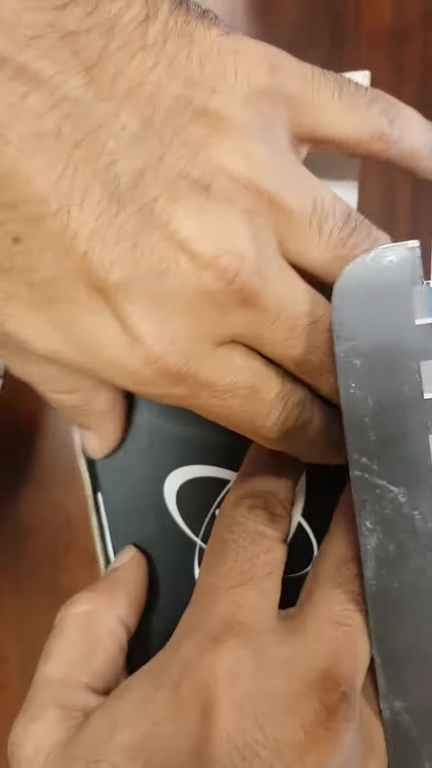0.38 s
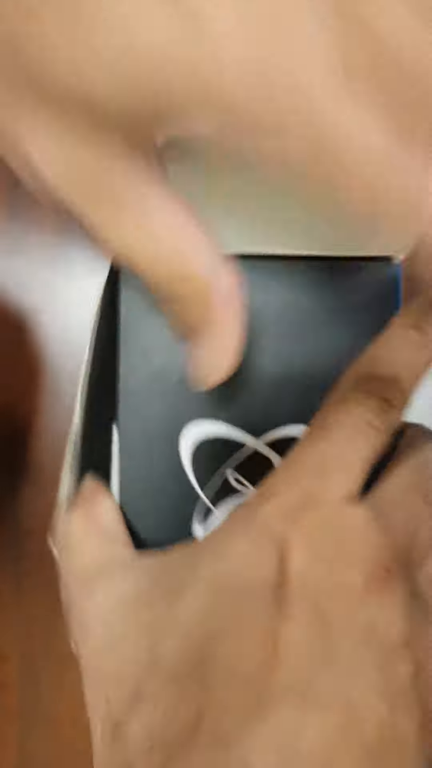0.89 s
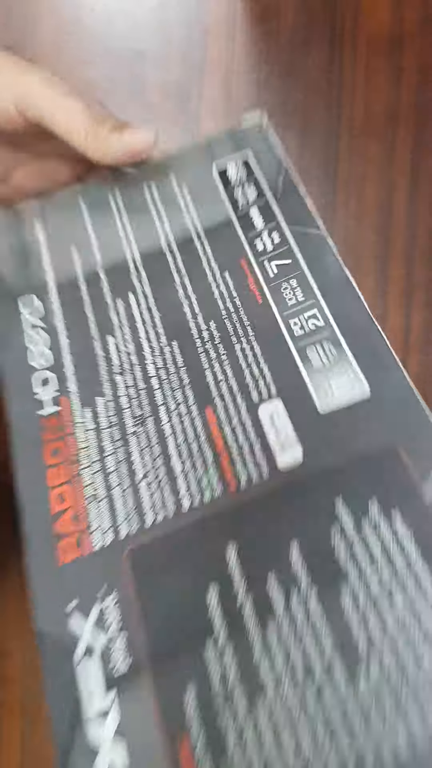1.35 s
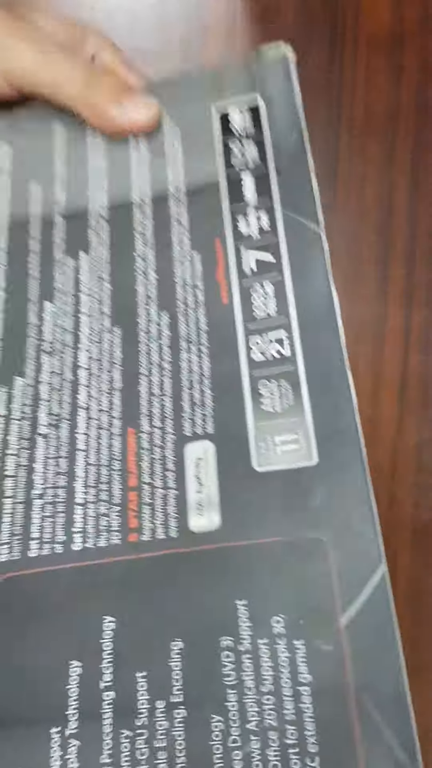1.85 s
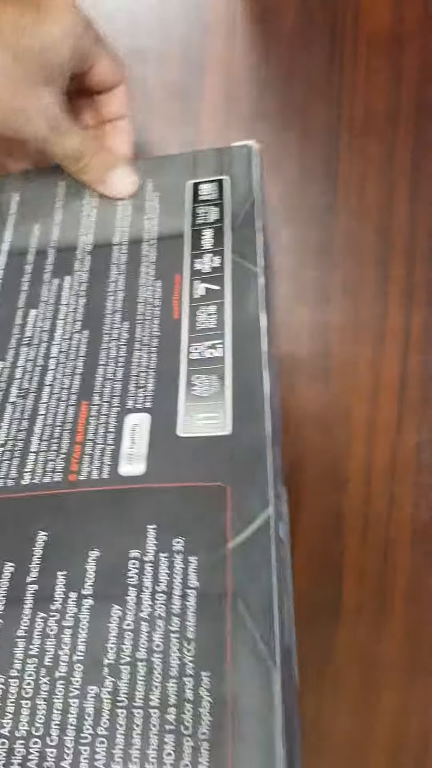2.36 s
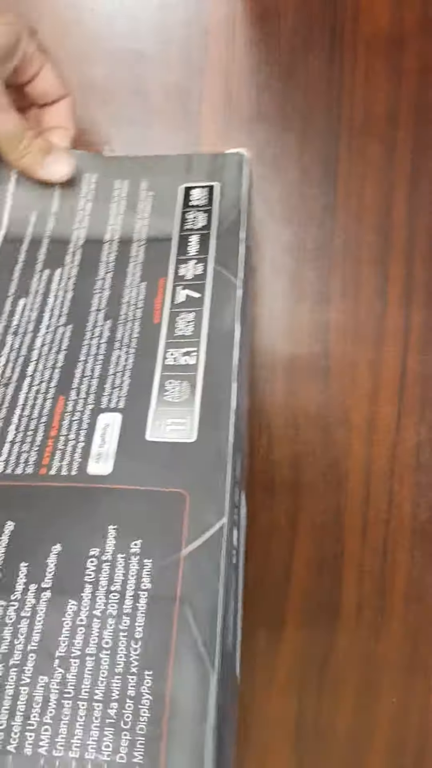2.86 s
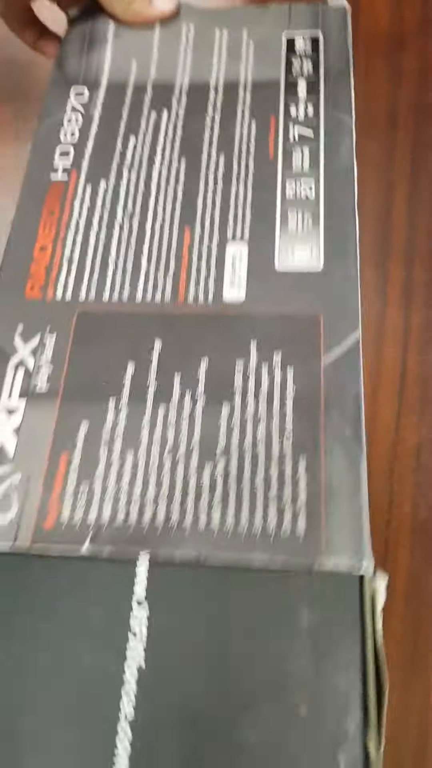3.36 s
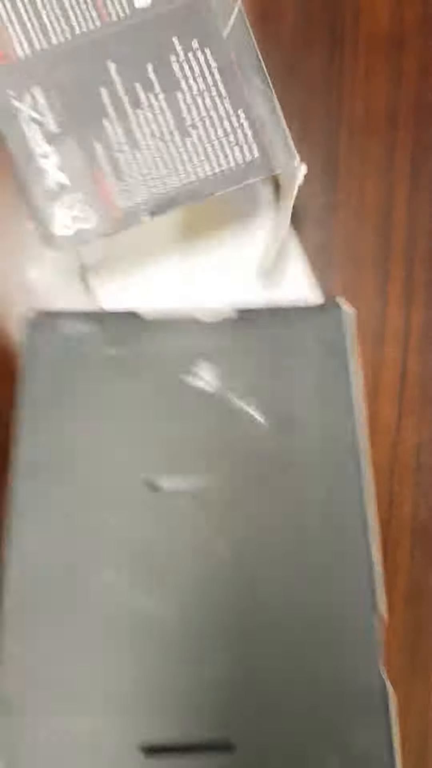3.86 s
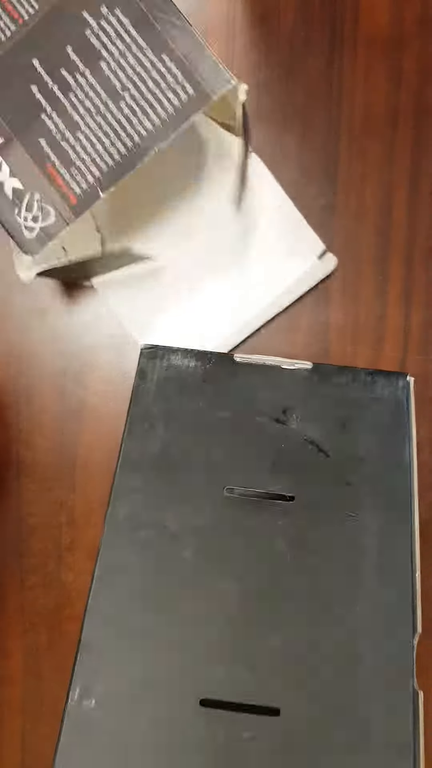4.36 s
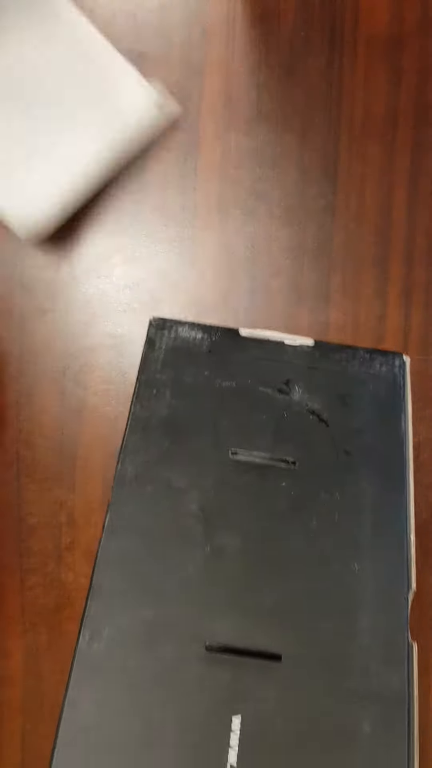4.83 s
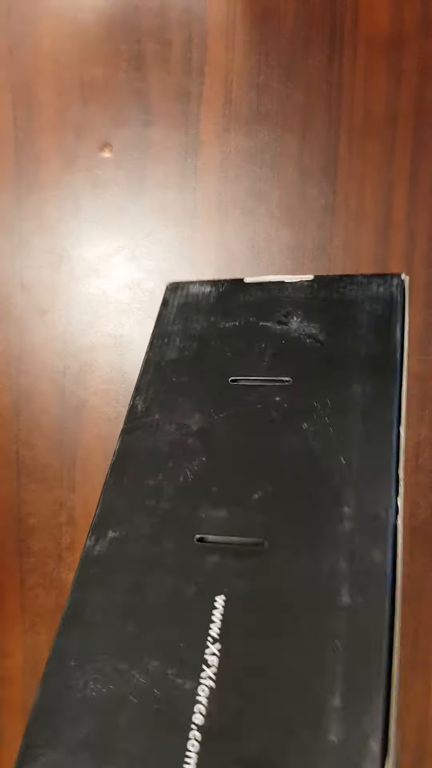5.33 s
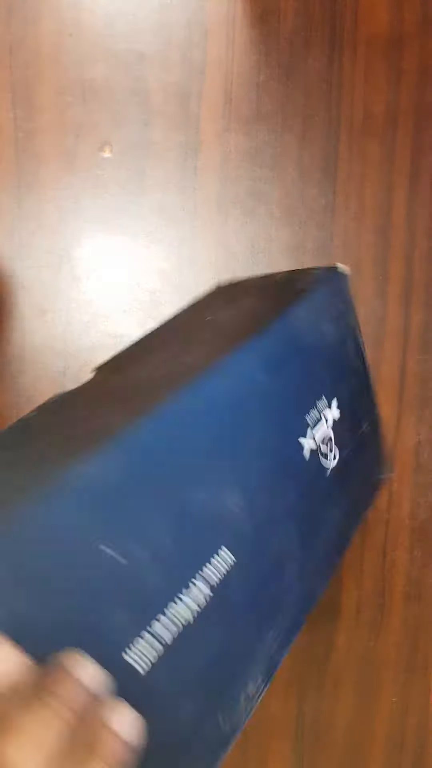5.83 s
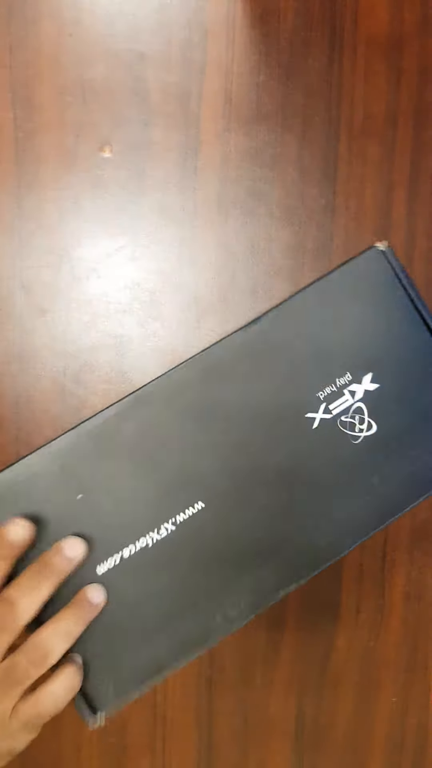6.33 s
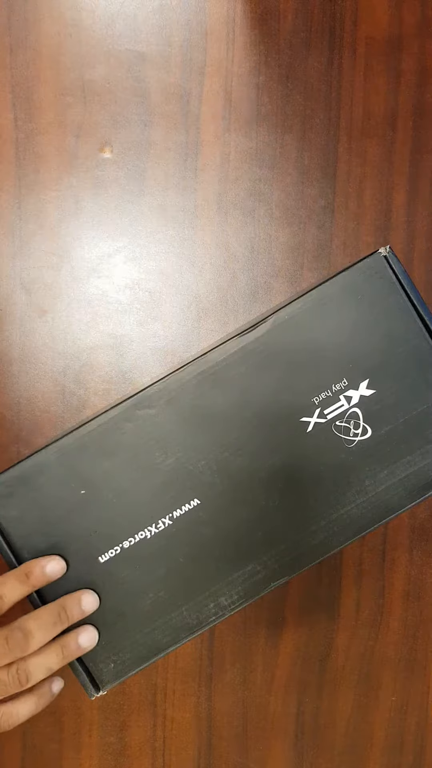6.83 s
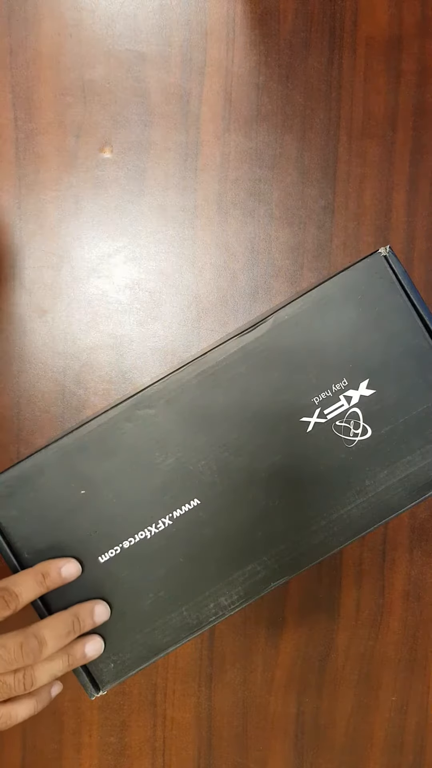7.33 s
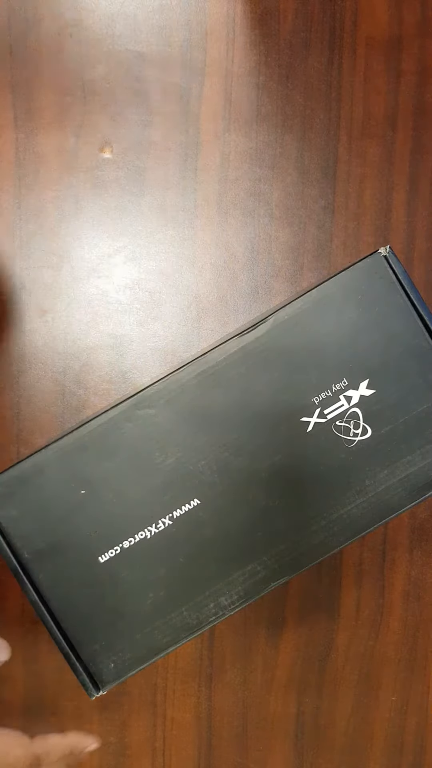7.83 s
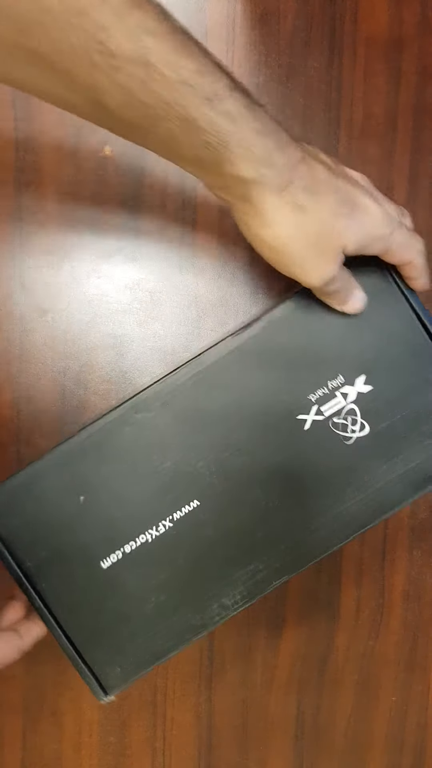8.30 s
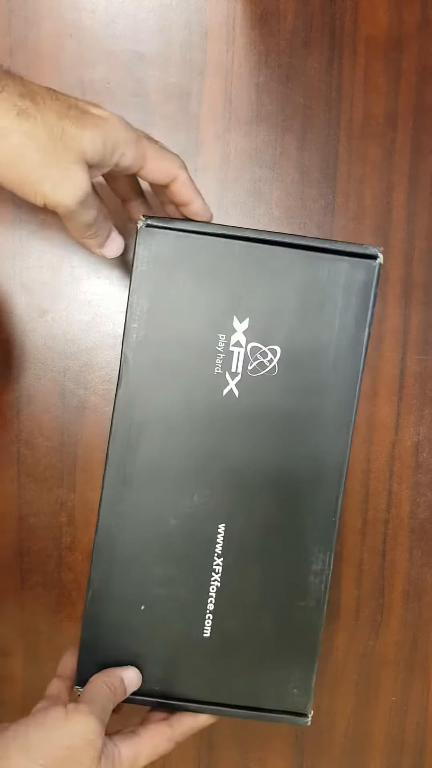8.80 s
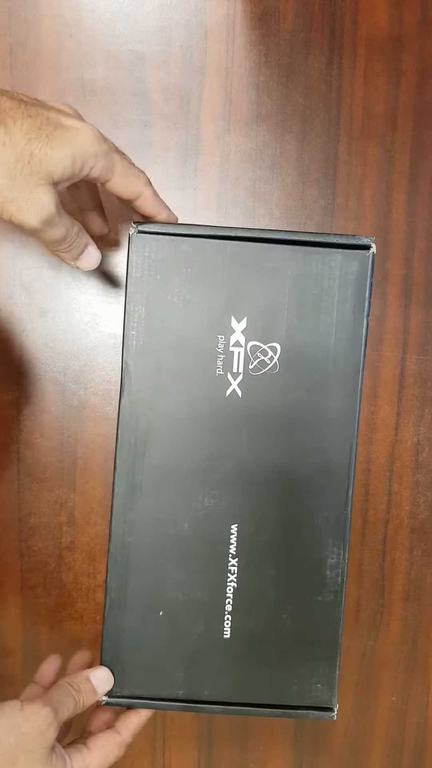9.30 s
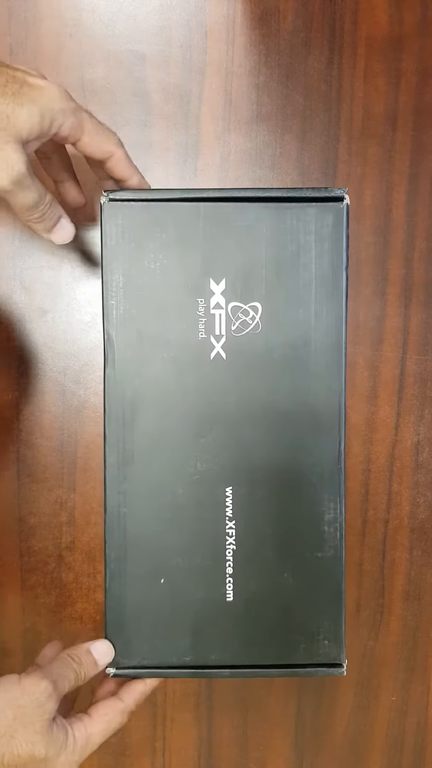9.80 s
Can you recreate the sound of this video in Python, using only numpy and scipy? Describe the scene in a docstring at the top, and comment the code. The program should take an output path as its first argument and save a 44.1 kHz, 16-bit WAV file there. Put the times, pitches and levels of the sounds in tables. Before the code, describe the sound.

Cardboard boxes are pulled apart, knocked and turned on a wooden table, with dry scraping, hollow thumps and card snaps over a low hum.

```python
"""First come a low hum, soft card rubbing and a small knock: hands handle boxes on a wooden table.
Knocks and taps ring decaying sine tones of the box, card and table top; snaps are bursts of noise.
Sliding is friction made of random tiny catches, and a dragged box bottom judders.
Short echoes add a quiet room. The mains hum and air noise sink in the busy middle, then come back."""
import sys
import numpy as np
from scipy import signal
from scipy.fft import rfft, irfft, next_fast_len
from scipy.io import wavfile

SR = 44100
rng = np.random.default_rng(int(sys.argv[2]) if len(sys.argv) > 2 else 0)


def wav_record(signal):
    """Record a signal, one row per channel, as 16-bit PCM in the file named by sys.argv[1]."""
    frames = np.transpose(np.atleast_2d(signal))
    bounded = np.clip(frames, -1, 1)
    # unit amplitude maps onto the largest positive 16-bit level
    quanta = np.round(bounded * 32767).astype(np.int16)
    wavfile.write(sys.argv[1], SR, quanta)


def field_ratio(decibels):
    """Amplitude ratio for a level in dB (20 dB per decade); scalars and array-likes work."""
    return 10 ** (np.asarray(decibels, dtype=float) / 20)


N = 437913

# Knocks of the boxes: (time [s], box strength [dB], table thud re box [dB],
# card slap re box [dB], hardness [dB per octave])
KNOCKS = [(0.041, -34.5, -22, -36, -9), (0.155, -36.5, -11, -26, -2), (0.412, -42.5, -19, -3, 12),
          (0.585, -44, -30, 1, 14), (0.731, -27.5, -32, -8, 8.5), (0.745, -30.5, -27, -1, 13.5),
          (0.817, -30.5, -6, -7, -3), (0.866, -27.5, -18, -10, -12), (0.93, -19.5, -12, -11, 2),
          (1.083, -45, -2, 7, 7), (1.128, -46, -25, 4.5, 6.5), (1.225, -47.5, -18, 7, 17),
          (1.436, -19.5, -14, -8, 0.5), (1.482, -25.5, -3, -27, -12), (1.653, -31.5, -28, -19, -2),
          (1.723, -27.5, -32, -17, -2), (2.25, -31.5, -18, -15, 0), (2.326, -24.5, -28, -8.5, -15.5),
          (2.544, -39, -16, -18, 2), (2.599, -41, -22, -6, 8), (2.636, -23, -9, -9, 8.5),
          (2.874, -28.5, -31, -19, -0.5), (2.917, -38, -23, -11, -21), (3.587, -16, -5.5, -38.5, 3),
          (3.615, -10, -20, -23.5, 1), (3.65, -12, -21, -28, 7), (3.726, -20, -9.5, -16, -8),
          (3.754, -21, -35, -11, 1.5), (3.851, -10, -42.5, -49, 7), (3.898, -16, -17.5, -5, 6),
          (3.919, -9.5, -26.5, -11, 7.5), (3.949, -25, -19.5, -11.5, 11.5), (4.092, -26, -14.5, -25, 17),
          (4.104, -30, -4.5, -27.5, 17.5), (4.121, -21, -16, -21, 3), (4.14, -28.5, -27, -26, -3.5),
          (4.27, -22, -14.5, -22, 3.5), (4.295, -21, -2, -30, -1.5), (4.352, -21.5, 0.5, -41, -2),
          (4.376, -26.5, 2, -34, 4), (4.5, -40.5, -14, -11, 9), (4.585, -29.5, -40, -33, 2),
          (4.606, -28, -13, -23.5, 7), (5.029, -40, -4, -7.5, 5), (5.074, -48, 1.5, 3.5, 0),
          (5.257, -28, -5.5, -15.5, -17.5), (5.286, -33.5, -3, -16.5, 11), (5.36, -29, -5.5, -15.5, 1.5),
          (5.374, -32, -19.5, -2.5, -6.5), (5.476, -24, -27, -3, 0), (5.497, -27.5, -8.5, -2.5, 3),
          (5.687, -23, -3, -11.5, 1.5), (5.724, -27.5, -1.5, -12.5, -9), (5.866, -18.5, -22, -4, -4.5),
          (5.887, -25.5, -8, 0, -2), (5.921, -12, -24.5, -21.5, -8.5), (5.938, -9.5, -2, -2, 1),
          (6.018, -23, 0, -7, -9.5), (6.333, -27, -19, -3.5, 8.5), (6.401, -5, -5.5, -9, -1),
          (6.416, -10.5, -5.5, -19, 6), (6.443, -18.5, -6, -4, -2), (6.471, -27.5, -10, -11.5, -5.5),
          (6.497, -17, -1.5, -14.5, -3), (6.533, -26.5, 6.5, -7.5, -5), (6.591, -32.5, -2, -7, -1),
          (6.636, -44.5, -19, 5.5, 2), (6.742, -31.5, -2, -0.5, -11), (7.147, -38, -21, -16, 4.5),
          (7.253, -21.5, -17, -7, 6.5), (7.286, -24.5, -9.5, -35, -6), (7.442, -22.5, 0, -31, -7.5),
          (7.586, -37.5, -6, -6, 5), (8.233, -33.5, -7, -31, -10), (8.885, -61, -17, 14.5, 15.5),
          (8.969, -55.5, -11, 15, 4), (9.021, -61, -13, 12, 1), (9.216, -44.5, 0, -15, 4),
          (9.413, -34.5, -26, -12.5, 1)]
# Clean taps that mainly set one panel ringing:
# (time [s], strength [dB], panel pitch [Hz], ring time [share of the free ring])
TAPS = [(0.818, -27.5, 1560, 1.9), (0.857, -23.5, 1560, 2.2), (0.926, -23, 746, 0.3),
        (1.083, -31, 1560, 3.7), (1.165, -29, 1345, 0.74), (1.4396, -10, 112, 0.23),
        (1.491, -20.5, 112, 0.51), (2.327, -23.5, 1300, 0.83), (2.331, -20.5, 255, 0.46),
        (2.374, -23.5, 1241, 0.77), (2.377, -20.5, 250, 0.32), (2.393, -18.5, 1242, 0.37),
        (2.396, -19, 250, 0.27), (2.407, -23, 1220, 0.33), (2.41, -21, 250, 0.45), (2.635, -20.5, 960, 3.7),
        (3.585, -19.5, 690, 0.83), (3.587, -15.5, 474, 1.5), (3.619, -6.5, 92, 1.6),
        (3.637, -13.5, 464, 0.79), (3.727, -21.5, 792, 1.2), (3.851, -15, 465, 2), (3.851, -19, 705, 1.3),
        (3.853, -26.5, 255, 0.48), (3.919, -13, 776, 2.1), (4.095, -16, 800, 1.5),
        (4.107, -16.5, 433, 1.06), (4.124, -15.5, 340, 0.65), (5.263, -25, 1345, 0.95),
        (5.266, -21.5, 260, 0.55), (5.31, -36, 1400, 2.0), (5.398, -19, 800, 0.5), (5.418, -30, 800, 0.77),
        (5.471, -22.5, 250, 0.51), (5.475, -23.5, 790, 3), (5.509, -22.5, 252, 1.1),
        (5.684, -14.5, 112, 0.86), (5.692, -20, 405, 0.7), (5.888, -17.5, 1600, 2), (5.936, 0.5, 380, 0.52),
        (5.947, -11, 110, 0.8), (5.965, -8.5, 76, 0.77), (6.401, -2, 342, 0.26), (6.401, -13, 975, 0.91),
        (6.413, -9, 54, 0.5), (6.415, -6, 110, 0.28), (6.432, -7, 76, 0.59), (6.636, -33, 1100, .9),
        (6.708, -41, 1560, 3.3), (6.74, -21.5, 1300, 3.1), (6.74, -27, 2500, .5), (6.794, -33, 1350, 2.5),
        (6.742, -25, 1620, 1.1), (7.255, -20.5, 600, 2.9)]
# Ways the table top can ring: (pitch [Hz], relative level [dB], free time to fall 60 dB [s])
TABLE_MODES = [(54, -4, 0.3), (76, -29, 0.074), (98.4, -5, 0.055), (114.3, 3.5, 0.25)]
# Ways the box walls can ring: (pitch [Hz], relative level [dB], free time to fall 60 dB [s])
BOX_MODES = [(161, -11.5, 0.097), (228, -4, 0.068), (261.2, 0, 0.12), (340.2, -6, 0.2), (380, -4, 0.058),
             (427.2, -10.5, 0.13), (476.5, -4.5, 0.049), (601.5, -3, 0.039), (699, -16.5, 0.13),
             (793, -0.5, 0.02)]
# Ways the card panels can ring: (pitch [Hz], relative level [dB], free time to fall 60 dB [s])
CARD_MODES = [(875, -6, 0.038), (960, 12, 0.012), (1144, -1, 0.029), (1345, 6, 0.028), (1365, -0.5, 0.011),
              (1575, 9.5, 0.014), (1860, 6, 0.01), (2170, 4.5, 0.0098), (2497, -8, 0.05),
              (2680, -10.5, 0.027)]
# Low rumble of the handled box: (time [s], relative level in box [dB], level in table [dB])
RUMBLE = [(0.0, -66, -46), (0.58, -55, -51), (0.88, -55, -47), (2.02, -56, -53.5), (2.96, -55, -54),
          (3.34, -42, -54), (3.62, -49, -63), (3.76, -51, -31), (4.2, -48.5, -38), (5.03, -59.5, -49),
          (5.31, -60, -49), (5.45, -52, -53), (5.72, -46, -45), (5.92, -49.5, -45.5), (6.11, -46, -58),
          (6.36, -39.5, -61), (6.5, -61.5, -34), (6.91, -56, -54.5), (7.24, -65, -58.5), (7.44, -38.5, -47),
          (7.63, -54, -47.5), (7.88, -68.5, -63.5), (8.68, -60.5, -58.5), (9.13, -65.5, -53),
          (9.62, -54.5, -49.5), (9.93, -59, -54)]
# Card edges snapping: (time [s], strength [dB], time to fall 60 dB [s], treble re the rest [dB])
SNAPS = [(0.4125, -37.5, 0.026, -16), (0.445, -47, 0.032, -22), (0.7295, -30.5, 0.03, -17),
         (0.857, -30, 0.21, -8.5), (0.9265, -29.5, 0.035, -0.5), (1.0795, -32.5, 0.036, -22),
         (1.131, -35.5, 0.035, 11.5), (1.4223, -40, 0.067, -3), (1.4372, -35, 0.04, -23),
         (1.4917, -41, 0.065, -1), (2.326, -33.5, 0.037, -22.5), (2.604, -40, 0.049, -10),
         (2.6376, -19, 0.028, -19), (2.7377, -44.5, 0.094, -3), (2.8504, -42, 0.044, -9.5),
         (2.8778, -42, 0.04, 2), (2.9249, -47, 0.072, -3), (3.668, -29.5, 0.075, -18),
         (3.7223, -39, 0.12, 0.5), (3.7542, -27.5, 0.027, 16), (3.8949, -28.5, 0.065, -1.5),
         (3.9075, -22.5, 0.049, -4), (3.9158, -20.5, 0.02, -2), (4.0639, -48.5, 0.04, -1.5),
         (4.0892, -19, 0.054, -10.5), (4.345, -37.5, 0.11, -4), (4.606, -43, 0.06, 14.5),
         (5.0714, -47.5, 0.062, -9.5), (5.254, -32.5, 0.049, -19), (5.3606, -34, 0.037, -14),
         (5.3745, -35.5, 0.035, -22), (5.3957, -48, 0.05, -24), (5.47, -26, 0.19, -13.5),
         (5.6782, -37.5, 0.06, -4), (5.7293, -36, 0.04, -11.5), (5.861, -46.5, 0.044, -17),
         (5.887, -33, 0.042, -5.5), (5.934, -26.5, 0.078, -13), (5.938, -19, 0.041, -7),
         (6.0819, -38, 0.04, -15.5), (6.1075, -35.5, 0.024, -12), (6.3248, -34.5, 0.11, -15.5),
         (6.3523, -31, 0.13, -2.5), (6.4022, -23.5, 0.035, -2), (6.6355, -45, 0.054, -9.5),
         (6.7386, -23.5, 0.059, -9.5), (6.7755, -33, 0.048, 5.5), (7.2524, -29, 0.041, 3.5),
         (7.4092, -42.5, 0.1, -18.5), (7.4365, -34, 0.1, -27), (8.8792, -38, 0.04, -19),
         (8.896, -40.5, 0.03, -16), (8.9402, -39, 0.068, -7), (8.968, -37.5, 0.037, -3.5),
         (8.986, -47.5, 0.03, -15), (9.0156, -36.5, 0.04, -19), (9.344, -59.5, 0.068, 12),
         (9.38, -51, 0.071, 0), (9.411, -37.5, 0.036, -13)]
# Faces sliding, each swelling and fading:
# (start [s], length [s], hiss [dB], treble re hiss [dB], card rustle [dB])
SLIDES = [(-.05, 0.38, -63, 6.5, -54.5), (0.281, 0.23, -61, 5, -52.5), (0.465, 0.25, -65.5, -5, -61),
          (0.547, 0.097, -51.5, -6, -72), (0.633, 0.32, -53, -7, -50), (0.773, .25, -48, 2.5, -52.5),
          (0.947, 0.21, -53.5, 0.5, -50.5), (1.061, 0.26, -54.5, -5, -48.5),
          (1.302, 0.27, -53.5, -15, -43.5), (1.476, 0.51, -59, -9.5, -58), (1.754, 0.39, -62.5, 11.5, -77),
          (2.052, 0.26, -64.5, 12.5, -73), (2.197, 0.33, -61.5, -2, -62), (2.372, 0.22, -54, 4.5, -67),
          (2.54, 0.18, -55.5, -1, -73), (2.676, 0.41, -59.5, 0.5, -56.5), (2.883, 0.22, -63, 1, -53),
          (3.072, 0.42, -33, -0.5, -37), (3.356, 0.34, -36.5, 3.5, -40), (3.628, 0.15, -38, 0.5, -35),
          (3.73, 0.2, -58, 9.5, -45.5), (3.996, 0.15, -60.5, 2, -59.5), (4.386, 0.62, -68, 7, -63.5),
          (5.337, 0.41, -53.5, 1.5, -48), (5.768, 0.22, -52.5, 0.5, -50.5), (6.01, 0.58, -63, 6.5, -55.5),
          (6.284, 0.11, -43.5, -6, -34), (6.563, 0.33, -62.5, 2, -83), (6.673, 0.082, -55, -19, -47.5),
          (7.297, 0.43, -60.5, -10, -70), (8.284, 0.54, -54.5, 9, -55.5), (8.687, 0.4, -68.5, 4, -62),
          (8.851, 0.11, -53, -4, -54.5), (8.936, 0.17, -56.5, -0.5, -66), (9.107, 0.19, -66, 9, -74),
          (9.353, 0.42, -55.5, 6.5, -57)]
# Faces skidding to a stop after a jolt:
# (time [s], time to fall 60 dB [s], hiss [dB], treble re hiss [dB], card rustle [dB])
SKIDS = [(.735, 0.21, -36.5, -4, -42), (1.085, 0.063, -44, -3, -55), (2.636, 0.33, -43, -18, -76),
         (3.613, 0.099, -31, -12.5, -24.5), (3.918, 0.33, -41.5, -3.5, -34.5), (4.093, 1, -54, 1.5, -51),
         (4.27, 0.58, -47, -4.5, -46), (4.607, 1, -62, 3.5, -68), (5.07, 0.62, -79, -14, -58.5),
         (5.254, 0.31, -42.5, -8.5, -35.5), (5.474, 0.24, -45, -6.5, -42.5), (5.683, 0.9, -48, 0.5, -39.5),
         (5.938, 0.54, -40, -8, -28.5), (6.402, 0.49, -33, -10, -30), (6.739, 0.34, -43.5, -3.5, -38),
         (7.148, 0.23, -63, 2, -56.5), (7.256, 0.54, -38, -8, -37), (7.441, 0.21, -48, -5.5, -39),
         (7.587, 0.71, -69, -10, -53.5), (8.238, 0.53, -74, 14, -58.5), (5.025, 0.28, -70, 4, -48.5)]
# Colour of card friction: (frequency [Hz], relative level per hertz [dB])
FRICTION_COLOUR = [(1470, -2.5), (2500, -0.5), (4690, -3.5), (5110, -6), (6150, -9), (7830, -16),
                   (11900, -13.5), (15200, -19), (16000, -21)]
# The dragged box bottom slipping: (time [s], relative strength [dB])
SLIPS = [(6.105, -29.5), (6.129, -28.5), (6.143, -34), (6.181, -40), (6.203, -37), (6.223, -41),
         (6.247, -31.5), (6.265, -31), (6.278, -29), (6.295, -24.5), (6.307, -36), (6.322, -27),
         (6.344, -34)]
# Where the handled box is: (time [s], left minus right [dB])
PLACE = [(0.0, 2.0), (1.16, 2), (6.61, 2.5), (6.72, 6), (6.91, 2.5), (7.19, 5.5), (8.93, 2.5), (9.93, 2.5)]
# How alike the two sides sound: (frequency [Hz], likeness [0 to 1])
LIKENESS = [(30, .998), (60, .993), (125, .96), (250, .95), (500, .9), (1000, 0.1), (15000, 0.0)]
# Loudness of hum and air noise together: (time [s], relative level [dB])
HUM_LEVEL = [(0, -44.5), (1.3, -44.5), (3.3, -44), (3.7, -47.5), (4.6, -50.5), (5.2, -52), (5.6, -49),
             (6.3, -50), (6.8, -57), (7.8, -57), (8.6, -51), (9.6, -43), (9.93, -45)]
# Colour of the room's air noise: (frequency [Hz], relative level per hertz [dB])
AIR_COLOUR = [(82, -34), (140, -6.5), (158, -33.5), (255, -9), (322, -13), (755, -24.5), (1320, -20),
              (2970, -44.5), (7840, -44.5), (14200, -40.5), (16000, -62)]


def in_time(rows):
    """Join the columns of a table by straight lines, one value a sample."""
    s, *columns = np.transpose(rows)
    return [np.interp(np.arange(N) / SR, s, c) for c in columns]


def at_hz(points, hz):
    """Read a table between its points, evenly along musical pitch."""
    points_hz, values = np.transpose(points)
    return np.interp(np.log(hz), np.log(points_hz), values)


def rms_one(x):
    """Scale to an average strength (rms) of 1."""
    return x / np.sqrt(np.mean(x ** 2) + 1e-20)


def drift(rate_hz):
    """Slow random wandering with spread 1: noise smoothed twice, made at every 40th sample."""
    r = np.exp(-80 * np.pi * rate_hz / SR)
    white = rng.standard_normal(N // 40 + 2002)
    slow = signal.lfilter([1], [1, -2 * r, r * r], white)[2000:]
    return np.interp(np.arange(N) / 40, np.arange(len(slow)), rms_one(slow))


def pair(hz, white):
    """Two microphones hear the bass alike and the treble apart."""
    alike = np.clip(at_hz(LIKENESS, hz), 0, 1)
    shared = np.sqrt(.5 + alike / 2) * white[0]
    apart = np.sqrt(.5 - alike / 2) * white[1]
    return shared + apart * [[1], [-1]]


def ring(drive, hz, t60):
    """A unit click starts a sine of about height 1 that falls 60 dB in t60 seconds."""
    r = field_ratio(-60 / (max(t60, .01) * SR))
    w = 2 * np.pi * hz / SR
    return signal.lfilter([0, np.sin(w)], [1, -2 * r * np.cos(w), r * r], drive + 1e-18)


def coloured(white, spectrum):
    """Stereo noise shaped by a spectrum and by the likeness of the two sides; rms 1."""
    hz = np.maximum(np.fft.rfftfreq(N, 1 / SR), 20)
    inside = (hz > spectrum[0][0]) & (hz < spectrum[-1][0])
    return rms_one(irfft(pair(hz, rfft(white)) * field_ratio(at_hz(spectrum, hz)) * inside, N))


def grains(per_s, spread_db):
    """Friction: two streams of fibres catching at random, with uneven sizes."""
    caught = rng.random((2, N)) < per_s / SR
    size_db = spread_db * np.minimum(rng.exponential(1, (2, N)), 4)
    return rng.standard_normal((2, N)) * caught * field_ratio(size_db)


def bursts(times, gains, lengths_s):
    """Envelopes that jump up at each time and fall 60 dB within their own length."""
    out, t = np.zeros((len(gains[0]), N)), np.arange(SR) / SR
    for s, gain, length in zip(times, gains, np.clip(lengths_s, .004, 1)):
        i = int(s * SR)
        n = min(int(length * SR), N - i)
        out[:, i:i + n] += gain[:, None] * field_ratio(-60 * t[:n] / length)
    return out


def body(modes, part_db, blow_db, contact_s, rub_level, rocking_db, per_s, damping, centre_hz):
    """A set of ringing tones, struck by every knock and stirred by the rubbing between them."""
    s, box_db, _, _, hardness = np.transpose(KNOCKS)
    knock_db = box_db + part_db
    # after a knock the box rocks and rubs until it settles, within 0.13 s
    rocking = bursts(s, field_ratio(knock_db + rocking_db)[:, None], np.full(len(s), 0.13))
    luck = rng.normal(0, 1.8, (len(s), len(modes)))   # no two knocks excite the tones alike
    first = np.zeros(N)
    first[(s * SR).astype(int)] = field_ratio(7.5)   # the corner that lands first gives one sharp push
    rub = grains(per_s, spread_db=5.0)
    contact = rms_one(grains(9000, spread_db=2.0))   # a flat face lands unevenly: a rough burst
    struck, stirred = 0, 0
    for k, (hz, db, t60) in enumerate(modes):
        octaves = np.log2(hz / centre_hz)
        # a harder blow reaches the higher tones
        push_db = knock_db + blow_db + db + luck[:, k] + hardness * octaves
        push = bursts(s, field_ratio(push_db)[:, None], np.full(len(s), contact_s))
        # shifting the grains gives each tone its own stretch of them
        rough = pair(hz, np.roll(contact, 997 * k, axis=1))
        struck = struck + ring(push * (rough + first), hz, t60)
        rubbed = ring(pair(hz, np.roll(rub, 997 * k, axis=1)), hz, t60 * damping)
        stirred = stirred + field_ratio(db + 1 * octaves) * rubbed   # rubbing favours higher tones: 1 dB/octave
    return struck + (rub_level + rocking) * rms_one(stirred)


def box_walls(rustle, rumble_db):
    """The hollow box rings when knocked; rubbing and rumble stir its walls."""
    return body(BOX_MODES, part_db=0, blow_db=-30.0, contact_s=0.0756,
                rub_level=field_ratio(rumble_db) + field_ratio(-0.5) * rustle, rocking_db=-18.5,
                per_s=600, damping=0.81, centre_hz=330)


def card_panels(rustle):
    """Thin card slaps when knocked and rustles unevenly when rubbed."""
    slap_db = np.array(KNOCKS)[:, 3]
    return body(CARD_MODES, part_db=slap_db, blow_db=-28.0, contact_s=0.07056,
                rub_level=rustle * field_ratio(2.7 * drift(20)), rocking_db=-21.5,
                per_s=4100, damping=0.68, centre_hz=1440)


def table_top(rumble_db):
    """The table top gives low thuds under the knocks and a rumble between them."""
    thud_db = np.array(KNOCKS)[:, 2]
    return body(TABLE_MODES, part_db=thud_db, blow_db=-26.0, contact_s=0.042,
                rub_level=field_ratio(rumble_db), rocking_db=-8.0,
                per_s=430, damping=0.39, centre_hz=78.5)


def taps():
    """Each tap is one clean push into the tones nearest the panel that was hit."""
    rise_s = 0.00046   # a fingertip or corner is soft
    reach_oct = 0.033   # how far in pitch neighbouring panels are drawn in
    out, t = np.zeros(N + SR), np.arange(SR // 2) / SR
    hz, db, t60 = np.transpose(TABLE_MODES + BOX_MODES + CARD_MODES)[:, :, None]
    for s, strength_db, panel_hz, share in TAPS:
        reach = np.exp(-.5 * (np.log2(hz / panel_hz) / reach_oct) ** 2)
        near = reach[:, 0] > .03 * reach.max()
        decay = field_ratio(-60 * t / (t60[near] * max(share, .05)))
        rings = decay * np.sin(2 * np.pi * hz[near] * t) * (1 - np.exp(-t / rise_s))
        tap = np.sum(reach[near] * rings, axis=0) / reach.sum()
        i = int(s * SR)
        out[i:i + len(t)] += field_ratio(strength_db) * tap
    return out[:N]


def edges(hiss, hiss_top):
    """Card edges snap, and hiss while they slide with a wandering colour: all filtered friction."""
    s, strength_db, dying, bright_db = np.transpose(SNAPS)
    gains = field_ratio(np.c_[strength_db, strength_db + bright_db] - 7)   # 7 dB from strength to noise rms
    crack = field_ratio(-9.5) * bursts(s, gains, np.full(len(s), 0.0039))   # each snap opens with a crack
    snap, snap_top = bursts(s, gains, dying) + crack
    fibres = coloured(grains(7000, spread_db=1.5), FRICTION_COLOUR)
    top = signal.sosfilt(signal.butter(4, 7500, "high", fs=SR, output="sos"), fibres)
    low = rms_one(signal.sosfilt(signal.butter(4, 7500, "low", fs=SR, output="sos"), fibres))
    lowest = signal.sosfilt(signal.butter(2, 3500, "low", fs=SR, output="sos"), low)
    # the whole hiss flutters, and each range of pitch also wanders by itself
    flutter = field_ratio(0.42 * drift(40))
    wandering = lowest * field_ratio(0.92 * drift(17)) + (low - lowest) * field_ratio(0.78 * drift(13))
    shimmer = field_ratio(1.2 * drift(15))
    lower_part = snap * low + hiss * flutter * wandering
    return lower_part + (snap_top + hiss_top * flutter * shimmer) * rms_one(top)


def rubbing():
    """Loudness of hiss, its treble and card rustle: slides swell, skids die, the hand is uneven."""
    s, dying, hiss_db, bright_db, rustle_db = np.transpose(SKIDS)
    r = np.exp(-1 / (0.0027 * SR))   # skids take about 2.7 ms to rise
    jolts = bursts(s, field_ratio(np.c_[hiss_db, hiss_db + bright_db, rustle_db]), dying)
    out = signal.lfilter([1 - r], [1, -r], jolts + 1e-18)
    t = np.arange(N) / SR
    for s, length, hiss_db, bright_db, rustle_db in SLIDES:
        span = slice(max(int(s * SR), 0), int((s + length) * SR))
        since, left = t[span] - s, s + length - t[span]
        rise, fall = 0.035 + 0.073 * length, 0.035 + 0.16 * length   # seconds
        ends = np.clip(np.minimum(since / rise, left / fall), 0, 1) ** 2
        arch_db = -6.5 * (2 * since / length - 1) ** 2   # loudest halfway
        levels_db = np.c_[[hiss_db, hiss_db + bright_db, rustle_db]]
        out[:, span] += field_ratio(levels_db + arch_db) * ends
    return out * field_ratio(1.1 * drift(9.6))


def judder():
    """The box bottom sticks and slips as it is dragged, each slip sounding the middle wall tones."""
    s, strength_db = np.transpose(SLIPS)
    slips = np.zeros(N)
    slips[(s * SR).astype(int)] = field_ratio(strength_db - 4.0)
    return sum(ring(slips, hz, 0.092) for hz, _, _ in BOX_MODES[3:6])


def room(x):
    """Echoes from six feedback delays a side, duller on every round."""
    t60_s, wall_cut_hz = 0.21, 12000
    size = next_fast_len(N + SR)
    hz = np.fft.rfftfreq(size, 1 / SR)
    dull = 1 / (1 + 1j * hz / wall_cut_hz)
    answer = np.zeros((2, len(hz)), complex)
    for k, lag in enumerate(rng.uniform(.012, 0.036, 12)):   # seconds a round
        loop = field_ratio(-60 * lag / t60_s) * dull * np.exp(-2j * np.pi * hz * lag)
        answer[k % 2] += (-1) ** (k // 2) * loop / (1 - loop)
    answer *= hz ** 2 / (hz ** 2 + 33.0 ** 2)   # light walls let the bass through
    return irfft(rfft(x, size) * answer, size)[:, :N]


def hum():
    """A slightly wavering mains tone with a faint octave, over the air noise of the room."""
    pitch_hz = 119.7 + .5 * drift(2.5)
    phase = 2 * np.pi * np.cumsum(pitch_hz) / SR
    waver = field_ratio(0.4 * drift(2))
    tone = np.sqrt(2) * waver * (np.sin(phase) + field_ratio(-19.5) * np.sin(2 * phase))
    air = field_ratio(-10.5) * coloured(rng.standard_normal((2, N)), AIR_COLOUR)
    return field_ratio(in_time(HUM_LEVEL)[0]) * (tone + air)


def scene():
    """Mix box, card, taps and friction over the table top, with room echoes and hum."""
    hiss, hiss_top, rustle = rubbing()
    box_rumble_db, table_rumble_db = in_time(RUMBLE)
    handled = box_walls(rustle, box_rumble_db) + card_panels(rustle)
    handled = handled + taps() + edges(hiss, hiss_top) + judder()
    # the handled box moves between left and right; the table top stays put
    placed = handled * field_ratio(in_time(PLACE)[0] * [[.5], [-.5]])
    echoes = field_ratio(-12.5) * room(handled)
    return placed + table_top(table_rumble_db) + echoes + hum() * field_ratio([[-.4], [.4]])


def band_limit(x):
    """A steep low-pass at the top of the band."""
    return signal.sosfilt(signal.butter(12, 16680, fs=SR, output="sos"), x)


def record(dry):
    """Cut the bass below 40 Hz, add faint microphone hiss and softly round the peaks."""
    x = signal.sosfilt(signal.butter(4, 40, "high", fs=SR, output="sos"), dry)
    x = x + field_ratio(-91.5) * rng.standard_normal(x.shape)
    mix = 1.028 * np.tanh(x / 1.323)
    return band_limit(mix)


dry = scene()
out = record(dry)
wav_record(out)
```